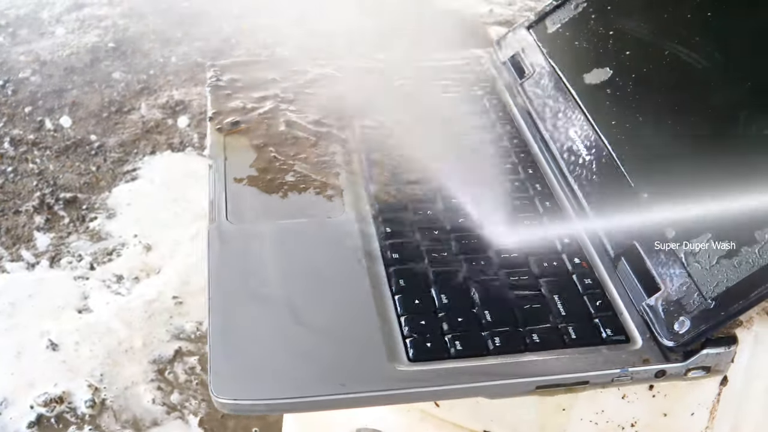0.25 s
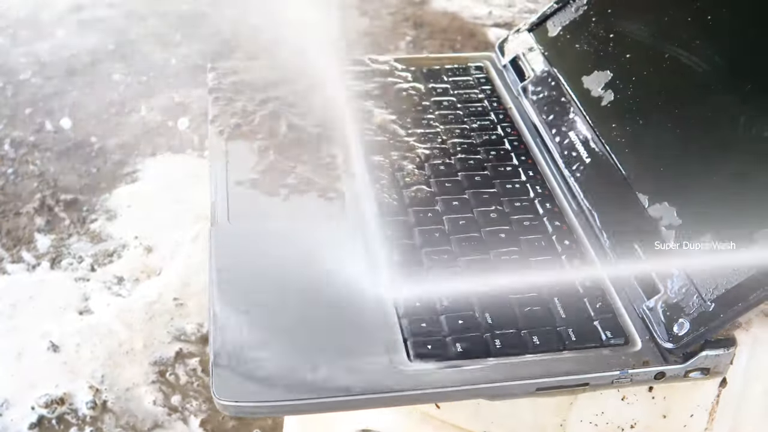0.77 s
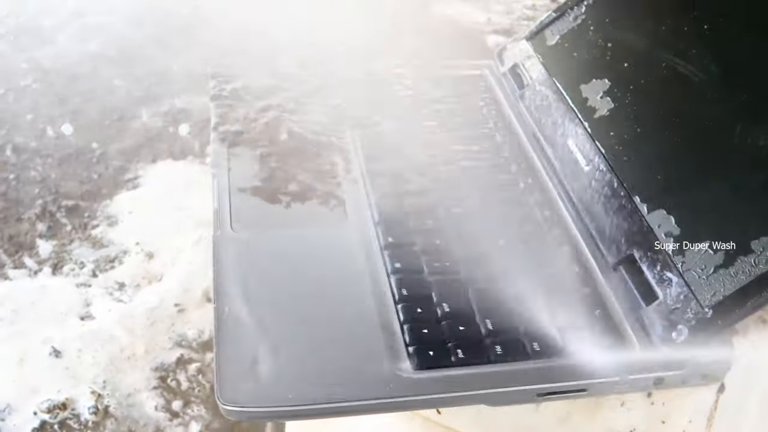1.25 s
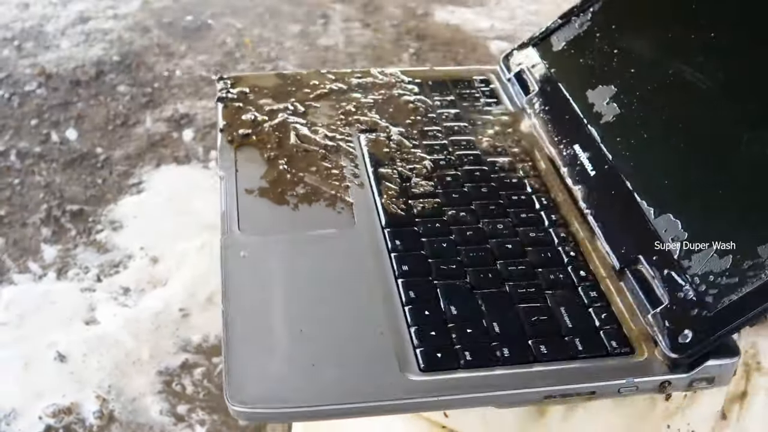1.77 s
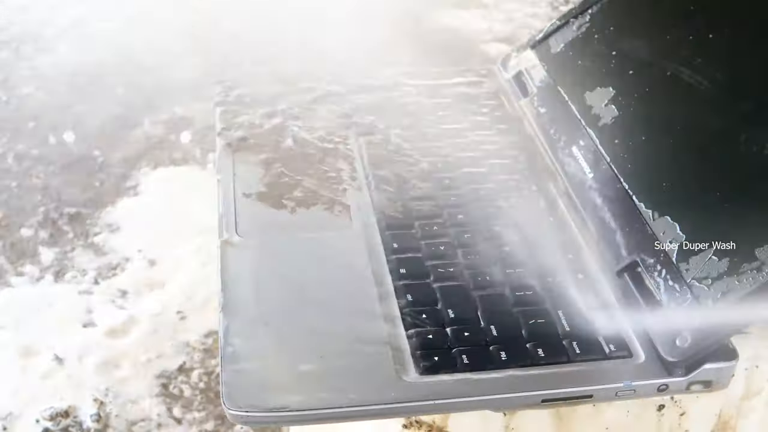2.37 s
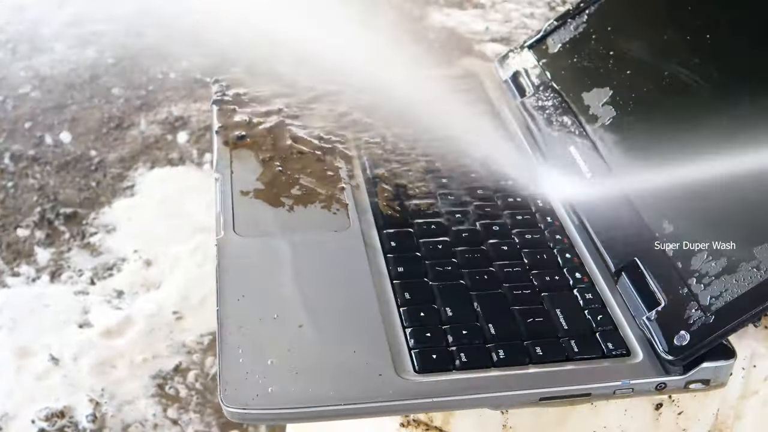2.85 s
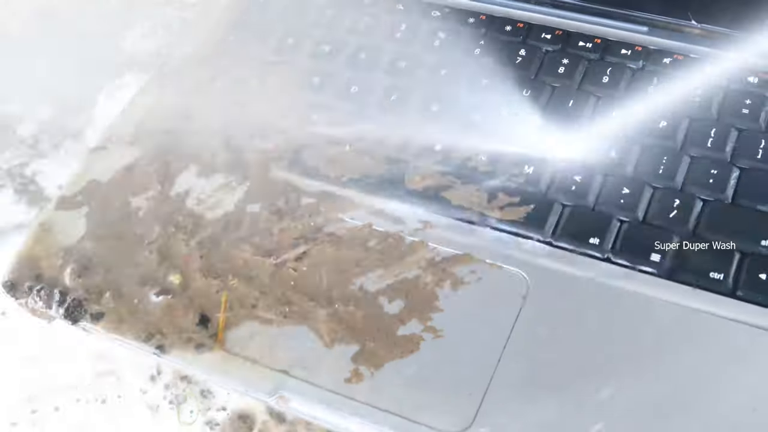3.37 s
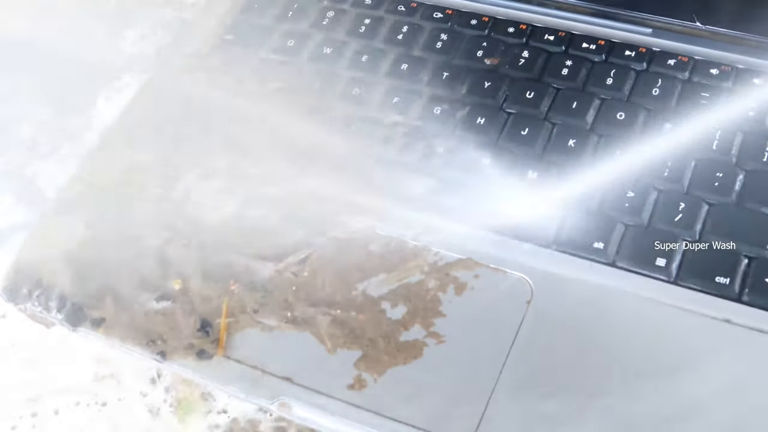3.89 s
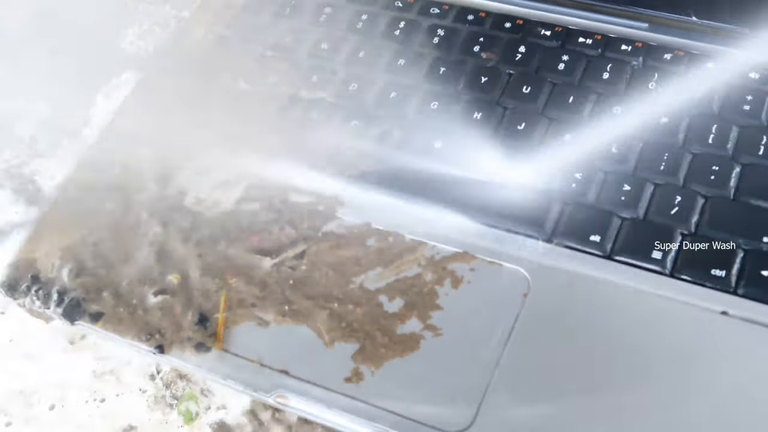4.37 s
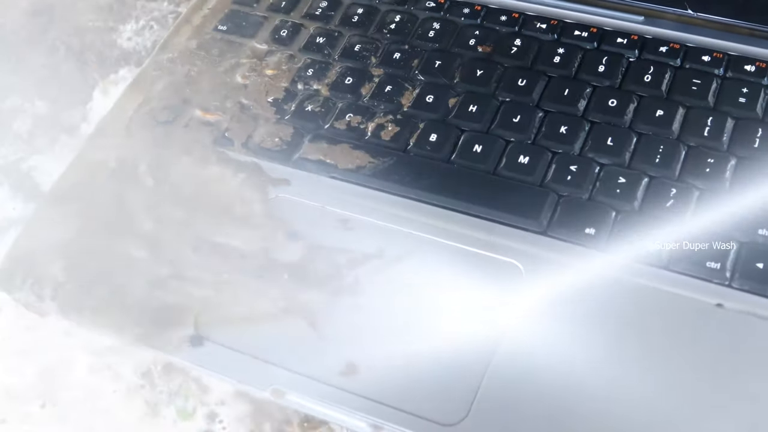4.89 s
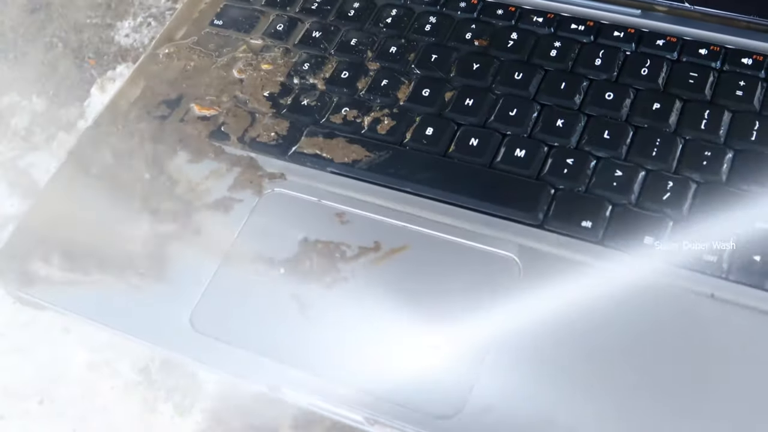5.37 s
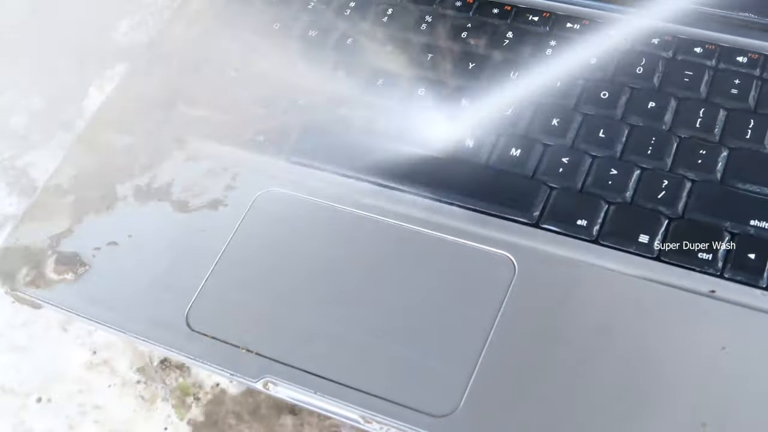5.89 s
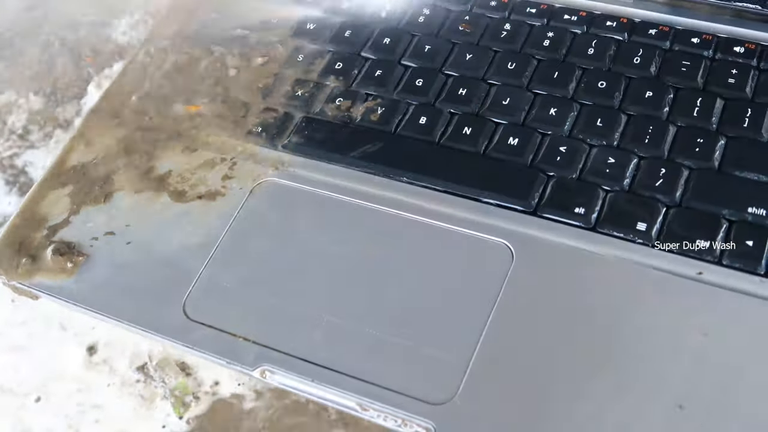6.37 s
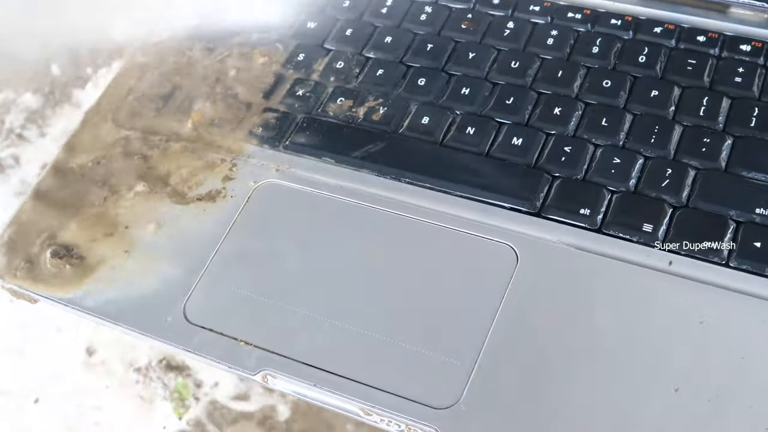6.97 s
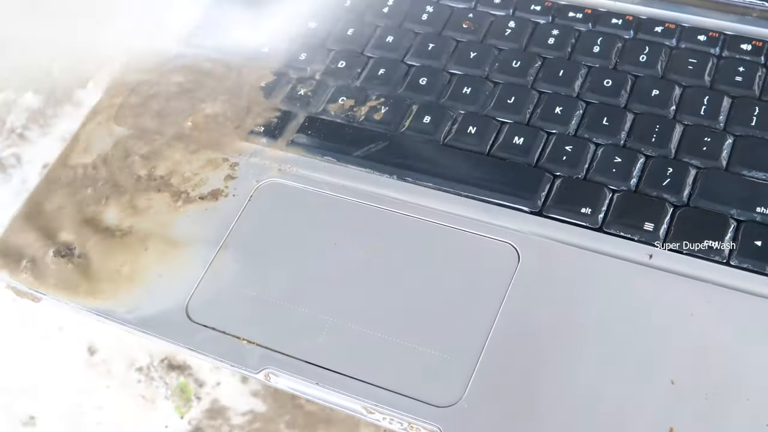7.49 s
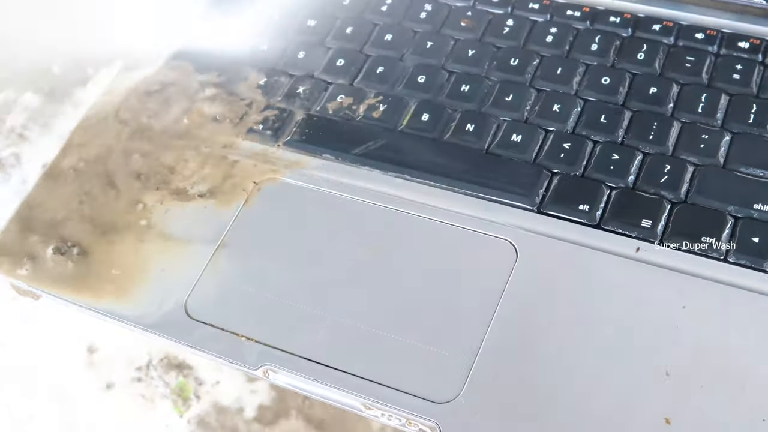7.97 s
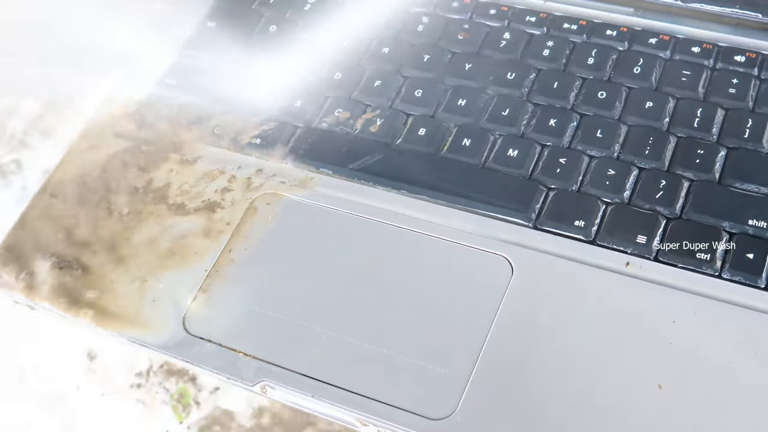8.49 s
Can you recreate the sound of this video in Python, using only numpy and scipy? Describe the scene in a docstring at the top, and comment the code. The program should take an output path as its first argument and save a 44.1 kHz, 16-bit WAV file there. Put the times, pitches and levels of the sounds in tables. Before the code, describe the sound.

A pressure-washer jet is already spraying an open laptop outdoors, heard close in stereo. Bright hiss, crackling drops and key rattle quickly strengthen at 0.2 s and stay forceful until about 1.4 s, pulsing rapidly above a low watery rush and a steady pump-motor hum of several hundred hertz. From 1.7 to 2.1 s the spray thins, and short ringing rasps come from the hinge slot. It swells again around 2.3-2.5 s, then weakens, with brief hollow howls from water-filled gaps until 3.4 s. There the sound jumps closer and flares repeatedly until 4.6 s. From 4.8 to 5.7 s it becomes a finer, thinner fizz on the smooth deck. At 5.8 s a hard splash returns, followed by uneven crackling surges and soft air puffs buffeting the microphone, mostly between 6 and 7.4 s. The impact drifts from right to left, continuing to the end at 8.7 s.

```python
"""A rushing, crackling spray is heard first: a pressure washer plays its jet over an open laptop outdoors.
Random drops hammer the keys and deck, over the even hiss of the jet, a low rumble and the hum of the pump
motor. Filtered noise makes short howls from gaps under the keys, and the hinge slot rings with drops.
Puffs of air buffet the close microphone later on. Three pump pistons make the spray pulse."""
import sys
import numpy as np
from scipy import signal
from scipy.fft import rfft, irfft, next_fast_len
from scipy.io import wavfile
from scipy.ndimage import uniform_filter1d, map_coordinates

SR = 44100
rng = np.random.default_rng(int(sys.argv[2]) if len(sys.argv) > 2 else 0)


def digitize_waveform(pressure):
    """Quantize a signal to 16-bit integers and store it at the path in sys.argv[1].

    Rows of a 2-D input are taken as channels; values are limited to [-1, 1].
    """
    field = np.atleast_2d(pressure).T
    bounded = np.clip(field, -1, 1)
    quanta = np.round(bounded * 32767).astype(np.int16)
    wavfile.write(sys.argv[1], SR, quanta)


N = 385434
TIME = np.arange(N) / SR  # seconds

# Levels are settings before the flares, wavering and left-right shading below are added.
# The jet's path, coarse over the keys and fine on the smooth deck:
# (time [s], splash level [dB], mist above splash [dB])
JET_PATH = [(0.0, -28.7, 3.5), (0.11, -32.5, 5), (0.16, -22, 0.5), (0.86, -19, -3.5), (0.94, -27, -1),
            (1.1, -19, -1), (1.45, -25.5, 4), (1.75, -29, 1.5), (2.15, -29, 0), (2.5, -26.5, 3.5),
            (2.78, -36, 3.5), (3.17, -28.5, 2.5), (3.39, -34, 4), (3.41, -22.7, 1), (4.05, -28.5, -1),
            (4.5, -25.5, -1), (4.8, -34.5, 7.5), (5.5, -33.5, 6.5), (5.82, -27.5, -0.8),
            (5.84, -19.5, -2.5), (6.5, -23.5, 3.5), (7.6, -25.5, -1.8), (8.74, -22, 0.6)]
# The jet catches a key edge and flares up:
# (time [s], half length [s], splash rise [dB], extra mist rise [dB])
KEY_EDGE_FLARES = [(0.187, 0.017, 2.5, 2), (0.313, 0.014, 0, 7), (0.82, 0.0083, 3.5, -3),
                   (1.004, 0.02, 5, 3.5), (1.26, 0.01, 2.3, 2), (1.42, 0.057, 3.5, -0.5),
                   (2.284, 0.069, 3.5, 3), (2.476, 0.06, 6.5, -2), (2.52, 0.013, 6, -1),
                   (2.652, 0.025, 5.8, -1.5), (3.546, 0.043, 2.5, 3), (3.759, 0.051, 4.5, 3.5),
                   (3.965, 0.069, 4.5, 2.5), (4.165, 0.03, 4.5, 2.2), (4.27, 0.037, 6, 3),
                   (4.455, 0.068, 4.5, 2.2), (4.62, 0.01, 0.5, 3.5), (5.954, 0.022, 0.2, 4),
                   (6.366, 0.014, 2.5, 1.5), (6.71, 0.059, 0.6, 3.5), (6.896, 0.012, 2.4, 5),
                   (6.99, 0.015, 2.5, 1), (7.18, 0.041, 2.8, 4.5), (7.295, 0.009, 1.5, 4),
                   (7.457, 0.11, 1.5, 5.5), (7.614, 0.016, 4.5, 2.5), (7.817, 0.078, 2.5, 4.3),
                   (7.947, 0.015, 3, 1.0), (8.148, 0.02, 3.5, 1), (8.239, 0.035, 0.5, 6.5),
                   (8.35, 0.02, 1.5, 0.5), (8.565, 0.011, 1.6, 2.5)]
# Drumming of the case, louder where the jet hits squarely: (time [s], level [dB])
DECK_LEVEL = [(0, -30.5), (.76, -31), (.9, -28), (1.1, -31.5), (2.25, -34), (2.5, -31), (2.82, -35),
              (3.17, -28), (3.5, -34), (4.45, -34), (5.25, -31.3), (5.9, -30.5), (6.13, -34), (6.21, -30.5),
              (6.47, -32.5), (6.8, -30.5), (7.04, -33.5), (8.74, -33)]
# Colours of key rattle, splash, fine mist and deck drumming: (frequency [Hz], level [dB])
KEY_COLOUR = [(1000, -41), (1800, -20), (2300, -2.5), (3200, 1.5), (4100, 1), (4800, -4.5), (6500, -32)]
SPLASH_COLOUR = [(2500, -23), (3900, -2), (4700, -0.5), (6000, 0), (7300, 1.5), (8600, -3), (9600, -4),
                 (12000, -33)]
MIST_COLOUR = [(6300, -40), (7700, -7.5), (8400, -4), (9300, -1.5), (10600, 3), (11300, 0.5), (12200, -5.5),
               (13500, -12.5), (15800, -30.5)]
DECK_COLOUR = [(300, -43), (520, -7), (750, 0), (900, -2.5), (1050, 2.5), (1220, -1), (1500, 2), (2000, 3),
               (2500, -0.5), (3500, -17)]
# Colour of the jet's hiss through the air: (frequency [Hz], level [dB])
NOZZLE_COLOUR = [(800, -19), (2000, 2), (6000, 10), (10500, 4), (13000, 8), (15800, -24)]
# Level of the low rush: (time [s], level [dB])
RUMBLE_LEVEL = [(0, -46), (.6, -47), (1.1, -44), (2.25, -42.5), (2.8, -50), (3.2, -44), (3.6, -47.5),
                (4.3, -47.5), (4.7, -44.5), (5.55, -40), (6.15, -46.5), (6.75, -42), (7.3, -42), (8.74, -42)]
# Colour of that low rush: (frequency [Hz], level [dB])
RUMBLE_COLOUR = [(15, -26), (30, -28), (50, -2), (90, -0.5), (200, 0.5), (310, 2.5), (440, 1.5), (600, 1),
                 (1000, -46)]
# Motor hum, the cooling fan strongest:
# (multiple of shaft speed, level from first standpoint [dB], level from later ones [dB])
HUM_TONES = [(1, -39, -32), (2, -25, -22), (3, -21.5, -21.5), (6, -16, -25), (7, -15, -21.5), (9, -25, -23),
             (10, -18, -19), (11, 0.5, 0), (12, -12.5, -14.5), (13, -11.5, -14.5), (14, -15.5, -20.5),
             (15, -19, -21), (20, -13, -30), (22, -24, -30), (25, -12, -36)]
# Overall hum: (time [s], level [dB])
MOTOR_LEVEL = [(0, -36.5), (2.3, -37.5), (2.7, -40), (3.3, -38), (3.7, -41), (4.6, -40), (5.7, -37.5),
               (8.74, -38)]
# Water-filled gaps howl as the jet crosses them; the width is a setting, scaled in hollows():
# (time [s], half length [s], frequency [Hz], width [Hz], glide [octaves/s], level [dB])
HOWLING_GAPS = [(0.091, 0.043, 2750, 900, 1.5, -20), (0.375, 0.028, 3740, 700, 1, -21.5),
                (0.519, 0.074, 1870, 400, -2, -31.5), (0.953, 0.082, 1000, 250, -2, -36),
                (2.397, 0.083, 1526, 110, 0.5, -31), (2.453, 0.021, 3940, 1200, 0.5, -26),
                (2.747, .035, 2430, 402, -2.5, -22.5), (2.815, 0.04, 3260, 1000, -0.5, -19.5),
                (2.95, 0.053, 2900, 950, -1.5, -23.5), (3.021, 0.044, 1130, 260, -1, -33.5),
                (3.097, 0.089, 1760, 400, -0.5, -32.5), (3.127, 0.073, 970, 280, -0.5, -36),
                (3.209, 0.055, 2730, 950, 2, -25.5), (3.371, .018, 2600, 600, 2, -24.5),
                (4.254, 0.019, 5260, 1600, 1, -18.5), (4.38, .08, 806, 110, -0.5, -42),
                (5.62, .05, 3000, 1800, 1.5, -28), (5.729, 0.069, 1040, 180, 1, -36.5),
                (5.796, .04, 1550, 260, 1.5, -34), (5.85, 0.013, 3180, 1500, -0.5, -17),
                (5.901, 0.02, 3520, 900, 0, -18), (5.936, 0.064, 840, 130, 0, -40),
                (6.17, 0.017, 3740, 450, 3, -21.5), (6.22, .035, 1440, 400, -0.5, -30.5),
                (6.679, 0.19, 796, 80, -1, -37.5), (7.929, 0.017, 3500, 900, 0.5, -27),
                (8.223, 0.054, 2250, 250, 0, -33), (8.391, .022, 3270, 1100, -0.5, -25.5),
                (8.711, 0.016, 3460, 900, -1, -23)]
# The jet dips into the hinge slot: (time [s], half length [s], level [dB])
HINGE_DIPS = [(1.745, 0.012, -21.5), (1.812, 0.017, -18.5), (1.899, 0.015, -19), (1.944, 0.02, -15.5),
              (2, 0.025, -16.5), (2.095, 0.014, -16.5)]
# Resonances of the slot, each applied twice: (frequency [Hz], width [Hz], level [dB])
SLOT_MODES = [(2380, 170, -0.5), (2800, 240, -1.5), (3600, 120, 6), (3780, 130, 6), (4200, 150, 4.5),
              (4780, 230, 7), (5150, 310, 0), (6000, 550, -2), (7150, 380, -1.5), (7470, 280, -2),
              (8230, 330, -1), (10400, 230, 0.5)]
# Point of impact; likeness is then adjusted with frequency:
# (time [s], bearing to the right [degrees], left-right likeness [0-1])
IMPACT_AIM = [(0, 41, 0.58), (.7, 21, 0.82), (1.15, 17, 0.57), (1.5, 62, 0.62), (2, 50, 0.88),
              (2.6, 52, 0.37), (3.2, 25, 0.86), (3.5, 34, 0.4), (4.5, 17, 0.42), (4.9, 21, 0.14),
              (5.6, 27, 0.73), (5.9, 19, 0.7), (6.4, -15.5, 0.65), (7, -35, 0.57), (8.74, -36, 0.73)]
# Shading by the raised screen from three standpoints: (frequency [Hz], left minus right [dB])
SIDE_SHADING = [(700, 1.5), (1200, -3.5), (2500, -6), (3500, -11.5), (4800, -2.5), (6300, -10.5), (8000, 3),
                (9900, -3), (12000, -8)]
FRONT_SHADING = [(700, -2), (1200, -3.5), (4000, -6.5), (6000, -3.5), (8500, -10.5), (11000, -1),
                 (13000, 1)]
CORNER_SHADING = [(700, -2), (1200, -1.5), (4000, 5), (6700, 4), (8400, -8), (10000, 0), (12500, 10.5)]
# Turning points as the standpoint shifts: (time [s])
STANDPOINT_TIMES = [3.39, 3.41, 6.2, 6.7]
# Strong puffs of air thrown off by the jet: (time [s], half length [s], level [dB])
AIR_PUFFS = [(3.727, 0.011, -34), (3.801, 0.0097, -30), (4.45, .03, -37), (4.652, .009, -38),
             (5.971, .024, -34), (6.208, 0.017, -31), (6.389, 0.0099, -27.5), (6.718, 0.03, -29.5),
             (6.783, .01, -30), (6.91, 0.01, -29), (7.154, .009, -33), (7.21, .011, -33),
             (7.306, 0.0088, -32), (7.396, 0.018, -34), (8.244, 0.018, -34)]
# Colour of air striking the microphone: (frequency [Hz], level [dB])
BUFFET_COLOUR = [(15, -45), (30, -33), (80, -12), (170, -7), (350, -1.5), (700, -3), (1200, -3), (2200, -8),
                 (5000, -23)]

USUAL_SPLASH_DB, RATTLE_DB = -25.5, -28  # an ordinary splash and its key rattle
RATTLE_GROWTH = 0.32  # dB of rattle gained per dB of splash
RATTLE_LOSS = 0.32  # dB of rattle lost per dB of mist above splash
TREMOR_RATE, TREMOR_DB = 22.04, 0.35  # unsteady hand: random points per second, level spread
NOZZLE_DB = -39.5
SHAFT_HZ = 48.68  # average pump speed, turns per second
EDDY_RATE, EDDY_DB, EDDY_SCATTER_DB = 30.3, -47.5, 4.5  # points per second, middle level, spread
TOP_HZ = 15900  # upper limit of the finished sound


def amp(db):
    """Turn decibels into a gain."""
    return 10 ** (np.asarray(db) / 20)


def unit(x):
    """Scale to an average strength (rms) of 1."""
    return x / np.sqrt(np.mean(x ** 2) + 1e-20)


def along(points, hz):
    """Read a frequency curve, joining its points on a log axis."""
    f, values = np.transpose(points)
    return np.interp(np.log(hz + 1), np.log(f + 1), values)


def curves(rows, t=TIME):
    """Join each column after the time with straight lines."""
    times, *columns = np.transpose(rows)
    return [np.interp(t, times, column) for column in columns]


def wobble(rate):
    """Draw a smooth random curve with the given number of points per second."""
    points = rng.standard_normal(int(N * rate / SR) + 4)
    return unit(map_coordinates(points, [TIME * rate]))


def filtered(x, response):
    """Change each frequency of a sound by the given response."""
    n = x.shape[-1]
    padded = next_fast_len(n + 8192)  # room for ringing after the end
    spectrum = rfft(x, padded) * response(np.fft.rfftfreq(padded, 1 / SR))
    return irfft(spectrum, padded)[..., :n]


def coloured(x, spectrum):
    """Shape a sound's frequencies, then scale it to rms 1."""
    return unit(filtered(x, lambda hz: amp(along(spectrum, hz))))


def resonance(f, hz, width):
    """Favour frequencies near hz, as one damped vibration does."""
    return 1j * f * width / (hz * hz - f * f + 1j * f * width)


def swell(t, s, half):
    """Rise and fall smoothly in a bell shape centred on time s."""
    return np.exp(-.5 * ((t - s) / half) ** 2)


def droplets(rate, scatter_db, share):
    """Mix uneven random hits with a rush of tiny ones, in rows of direct and scattered sound."""
    hits = rng.random((2, N)) < rate / SR
    sizes = amp(scatter_db * np.clip(rng.standard_normal((2, N)), -3, 2.6))
    signs = rng.choice([-1, 1], (2, N))
    impacts = unit(hits * sizes * signs)
    share = np.clip(share, 0, 1)
    rush = rng.standard_normal((2, N))
    return np.sqrt(share) * impacts + np.sqrt(1 - share) * rush


def churn(x, patchy_db):
    """A shifting film of water favours ever-changing patches of frequency."""
    spectrum = signal.stft(x, nperseg=512)[2]
    patches = rng.standard_normal(spectrum.shape[1:])
    for _ in range(2):
        patches = uniform_filter1d(patches, size=5, axis=0)  # smooth across frequency
        patches = uniform_filter1d(patches, size=10, axis=1)  # smooth across time
    return signal.istft(spectrum * amp(patchy_db * unit(patches)), nperseg=512)[1][:, :N]


def impact():
    """Rattle, splash and mist levels follow the jet's path and flare up at key edges."""
    splash_db, fineness_db = curves(JET_PATH)
    for s, half, rise_db, finer_db in KEY_EDGE_FLARES:
        flare = swell(TIME, s, half)
        splash_db = splash_db + rise_db * flare
        fineness_db = fineness_db + finer_db * flare
    splash_db = splash_db + TREMOR_DB * wobble(TREMOR_RATE)
    fineness_db = fineness_db + TREMOR_DB * wobble(TREMOR_RATE)
    rattle_db = RATTLE_DB + RATTLE_GROWTH * (splash_db - USUAL_SPLASH_DB)
    rattle_db = rattle_db - RATTLE_LOSS * fineness_db
    return rattle_db, splash_db, splash_db + fineness_db


def spray(shaft):
    """Drops strike keys and deck, pulsing with three pistons and fluttering as the jet breaks up."""
    keys_db, splash_db, mist_db = impact()
    deck_db, = curves(DECK_LEVEL)
    pistons_db = 0.42 * np.sin(3 * shaft) + 0.32 * np.sin(6 * shaft)
    pulse_db = pistons_db + 0.81 * wobble(55) + .5 * wobble(250)
    fine_pulse_db = pulse_db + 0.64 * wobble(35)

    # Heavy drops rattle the keys, small ones crackle and the finest fizz.
    heavy = churn(droplets(rate=3500, scatter_db=7.5, share=0.24), patchy_db=1.66) * amp(pulse_db)
    small = churn(droplets(rate=4000, scatter_db=6.0, share=0.48), patchy_db=1.57) * amp(pulse_db)
    fine = churn(droplets(rate=4400, scatter_db=7.5, share=0.41), patchy_db=1.57) * amp(fine_pulse_db)
    drumming = churn(rng.standard_normal((2, N)), patchy_db=2)

    deck = amp(deck_db) * coloured(drumming, DECK_COLOUR)
    keys = amp(keys_db) * coloured(heavy, KEY_COLOUR)
    splash = amp(splash_db) * coloured(small, SPLASH_COLOUR)
    mist = amp(mist_db) * coloured(fine, MIST_COLOUR)
    return deck + keys + splash + mist


def nozzle():
    """The jet itself hisses evenly on its way through the air."""
    return amp(NOZZLE_DB) * coloured(rng.standard_normal((2, N)), NOZZLE_COLOUR)


def rumble():
    """A low rush of noise plays throughout, nearly alike in both channels."""
    rumble_db, = curves(RUMBLE_LEVEL)
    middle, side = coloured(rng.standard_normal((2, N)), RUMBLE_COLOUR)
    side_curve = [(30, -28), (80, -33), (170, -20), (400, -11.5)]  # (frequency [Hz], level [dB])
    side = filtered(side, lambda hz: amp(along(side_curve, hz)))
    return amp(rumble_db) * np.array([middle + side, middle - side])


def motor(shaft, waver_db=0.42, side_waver_db=2.5, lag=0.00023):
    """The pump hums at multiples of its shaft speed; weak tones waver more than the fan tone."""
    hum_db, = curves(MOTOR_LEVEL)
    moved = np.interp(TIME, STANDPOINT_TIMES[:2], [0, 1])
    left_delay = lag * (1 - moved)  # seconds, until the standpoint changes
    phases = np.array([shaft - 2 * np.pi * SHAFT_HZ * left_delay, shaft])
    hum = np.zeros((2, N))
    for order, first_db, later_db in HUM_TONES:
        depth_db = waver_db if first_db > -6 else side_waver_db
        level_db = first_db + (later_db - first_db) * moved + depth_db * wobble(9)
        hum += amp(level_db) * np.sin(round(order) * phases + rng.uniform(0, 2 * np.pi))
    balance_db = np.array([[.9], [-.9]]) * moved
    return np.sqrt(2) * hum * amp(hum_db + balance_db)


def hollows():
    """Each gap rings as a broad resonance that slides as water fills or leaves it."""
    out = np.zeros((2, N))
    for s, half, hz, width, glide, db in HOWLING_GAPS:
        near = slice(max(0, int((s - .6) * SR)), int((s + .6) * SR))
        t = TIME[near]
        noise = rng.standard_normal((2, 2 * SR))
        howl = unit(filtered(noise, lambda f: resonance(f, hz, 1.35 * width) ** 2))
        # Reading the noise faster or slower slides its pitch.
        speed = 2 ** (glide * np.clip(t - s, -2 * half, 2 * half))
        position = np.cumsum(speed)
        sliding = np.array([map_coordinates(row, [position], order=1) for row in howl])
        out[:, near] += amp(db) * swell(t, s, half) * sliding
    return out


def hinge():
    """The long slot under the screen rasps at its own frequencies when the jet falls in."""
    blow = sum(amp(db) * swell(TIME, s, half) for s, half, db in HINGE_DIPS)

    def modes(f):
        """Add the slot's damped vibrations."""
        return sum(amp(db) * resonance(f, hz, width) ** 2 for hz, width, db in SLOT_MODES)

    drops = droplets(rate=2500, scatter_db=4, share=.35)
    return blow * unit(filtered(drops, modes))


def at_ports(x, spacing=0.017):
    """Direct sound reaches the nearer microphone opening first; scattered sound differs between them."""
    hz, t, (direct, scattered) = signal.stft(x, SR, nperseg=512)
    bearing, alike = curves(IMPACT_AIM, t)
    # (frequency [Hz], multiplier of likeness)
    focus_curve = [(600, 1.07), (1300, 0.93), (4000, 0.68), (8000, 1.13), (10500, 1.03), (14000, 1.46)]
    focus = along(focus_curve, hz)[:, None]
    turn = np.arccos(np.clip(alike * focus, 0, 1)) / 2
    # Spacing is in metres; sound travels at 343 m/s.
    lead = np.exp(1j * np.pi * hz[:, None] * spacing * np.sin(np.radians(bearing)) / 343)

    # Blend the side, front and corner standpoints.
    weights = ([0.92, 0.052, 0.16, 0.2], [0, 1, 0.57, 0], [0.6, 0, 0.34, 0.66])
    shares = [np.interp(t, STANDPOINT_TIMES, weight) for weight in weights]
    views = (SIDE_SHADING, FRONT_SHADING, CORNER_SHADING)
    tilt = amp(sum(np.outer(along(view, hz), share) for view, share in zip(views, shares)))

    left = (np.cos(turn) * direct + np.sin(turn) * scattered) * tilt / lead
    right = (np.cos(turn) * direct - np.sin(turn) * scattered) * lead
    balance = np.sqrt(2 / (1 + tilt ** 2))  # keeps the combined power steady
    return signal.istft(np.array([left, right]) * balance, nperseg=512)[1][:, :N]


def puffs():
    """Turbulent air buffets each microphone opening on its own, in strong puffs among weak eddies."""
    close = np.interp(TIME, STANDPOINT_TIMES[:2], [0, 1])  # eddies begin once the microphone is close
    eddy_db = EDDY_DB + EDDY_SCATTER_DB * np.minimum(wobble(EDDY_RATE), 2)
    strong = sum(amp(db) * swell(TIME, s, half) for s, half, db in AIR_PUFFS)
    force = close * amp(eddy_db) + strong
    return force * coloured(rng.standard_normal((2, N)), BUFFET_COLOUR)


def scene():
    """Mix all the sounds, with one shaft driving both the hum and the pulsing of the spray."""
    shaft_speed = SHAFT_HZ * (1 + 0.00047 * wobble(2.99))
    shaft = 2 * np.pi * np.cumsum(shaft_speed) / SR  # shaft angle in radians
    water = at_ports(spray(shaft) + nozzle() + hollows() + hinge())
    return water + rumble() * amp([[-.4], [.4]]) + puffs() + motor(shaft)


def record(dry):
    """Round off the tallest peaks, then remove frequencies at and above the upper limit."""
    rounded = dry / (1 + np.abs(dry / .9) ** 6) ** (1 / 6)
    return filtered(rounded, lambda hz: hz < TOP_HZ)


dry = scene()
out = record(dry)
digitize_waveform(out)
```